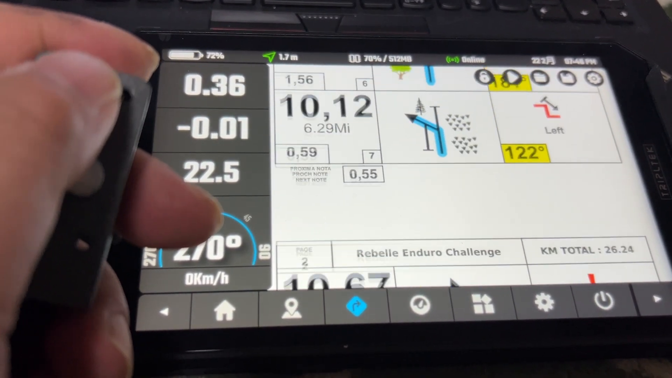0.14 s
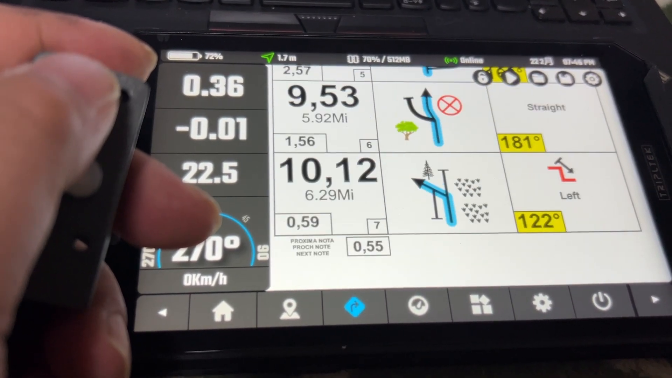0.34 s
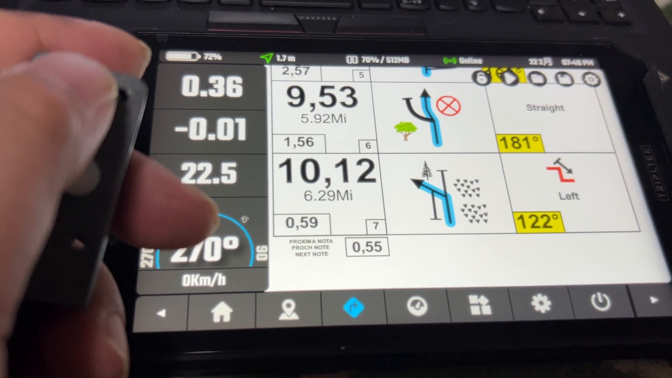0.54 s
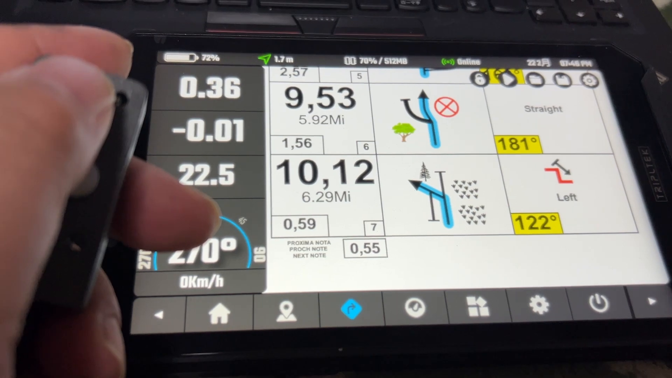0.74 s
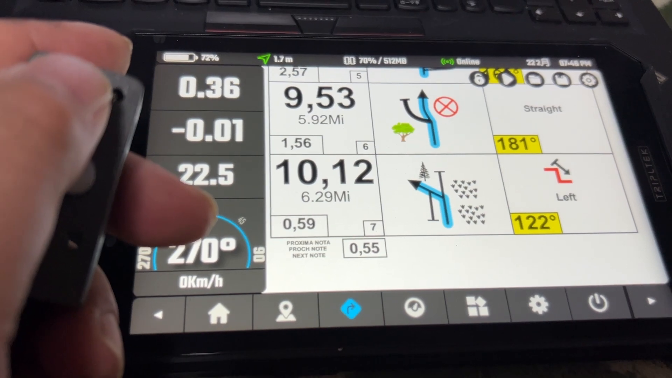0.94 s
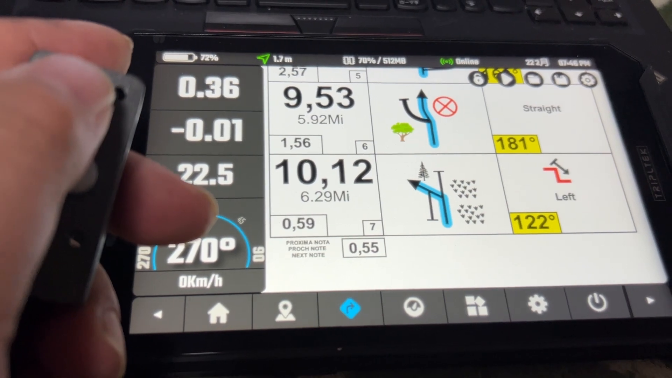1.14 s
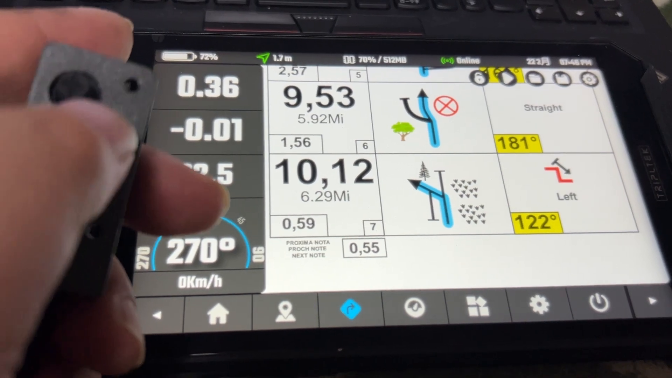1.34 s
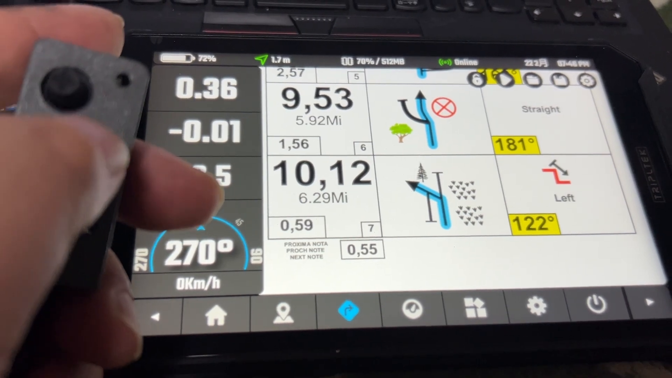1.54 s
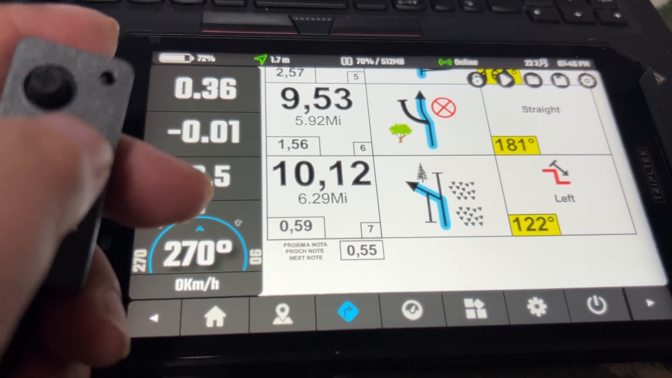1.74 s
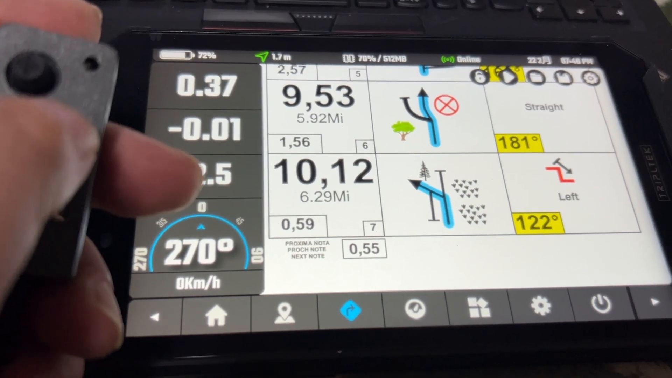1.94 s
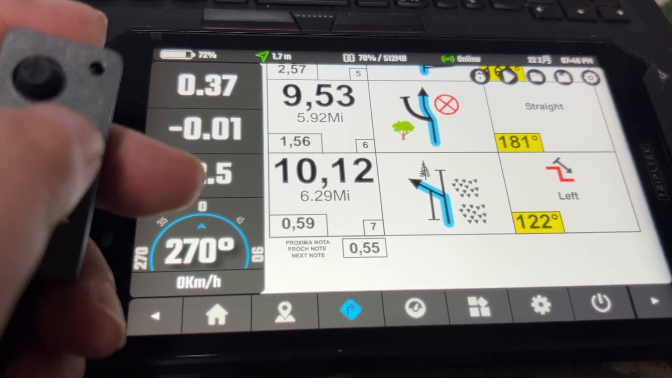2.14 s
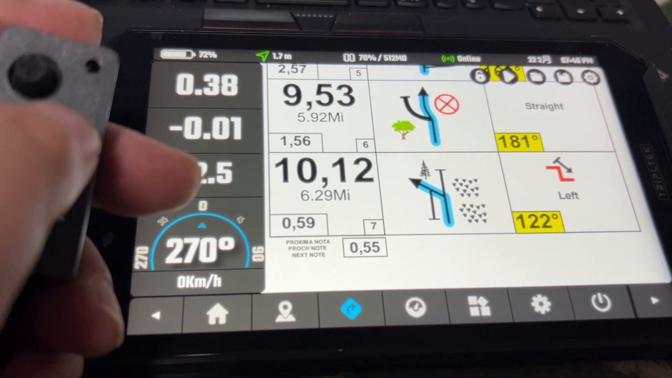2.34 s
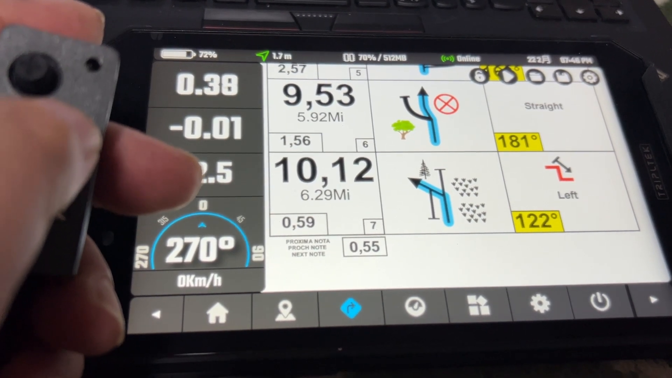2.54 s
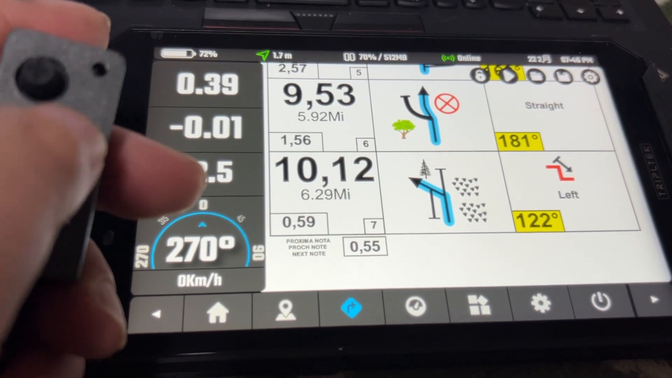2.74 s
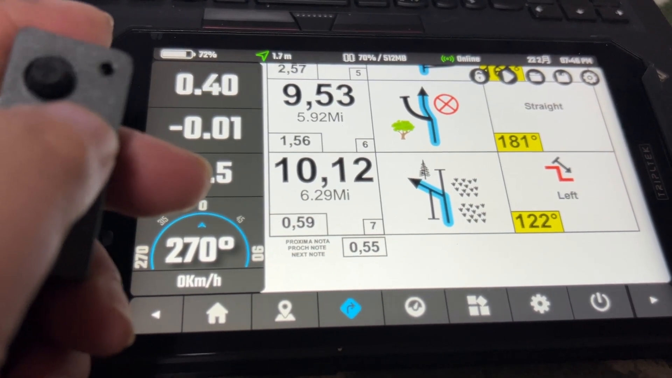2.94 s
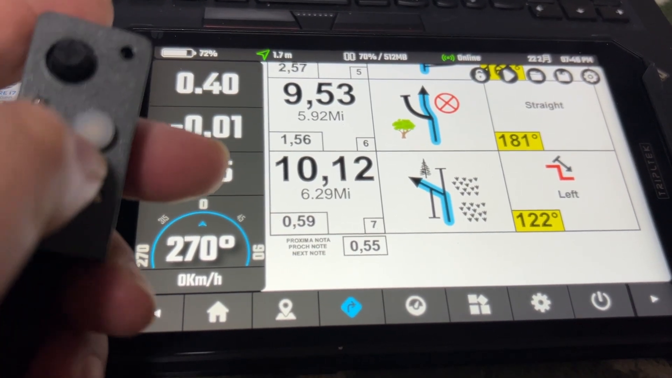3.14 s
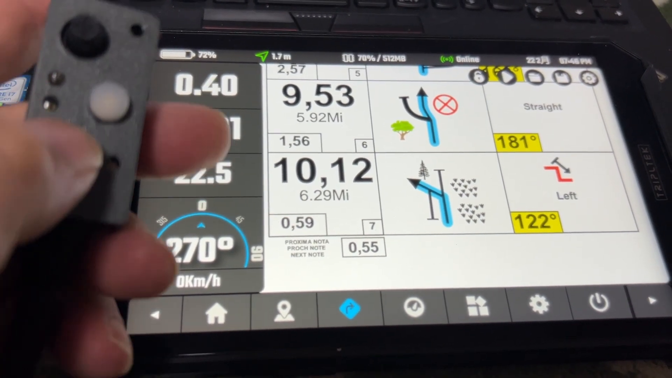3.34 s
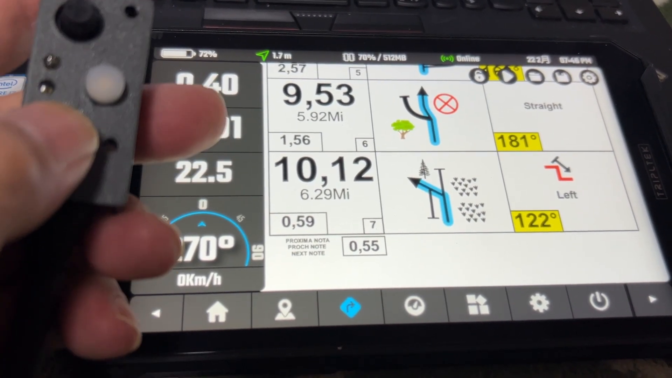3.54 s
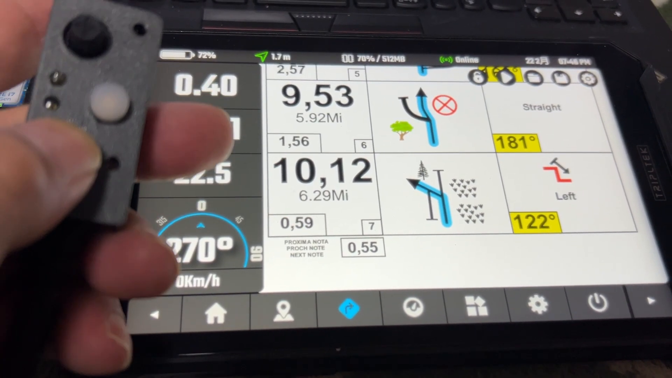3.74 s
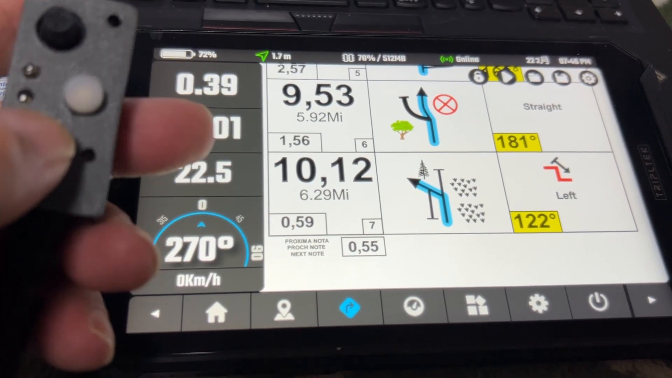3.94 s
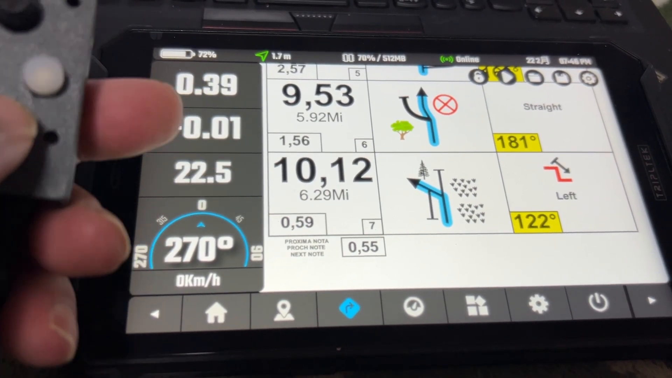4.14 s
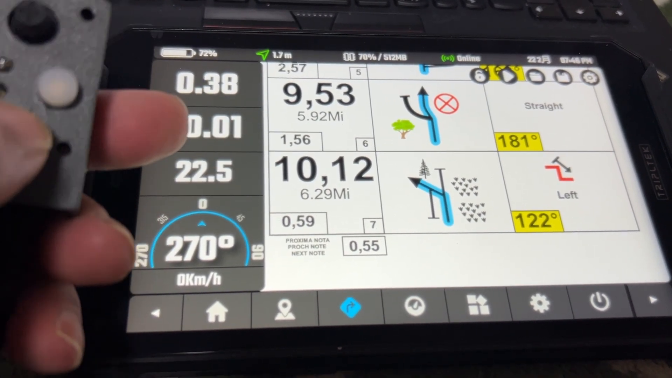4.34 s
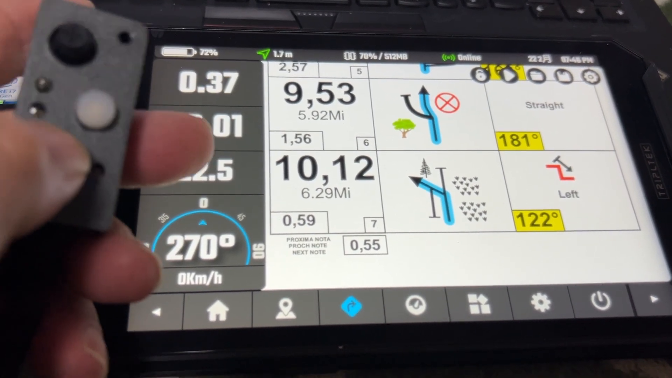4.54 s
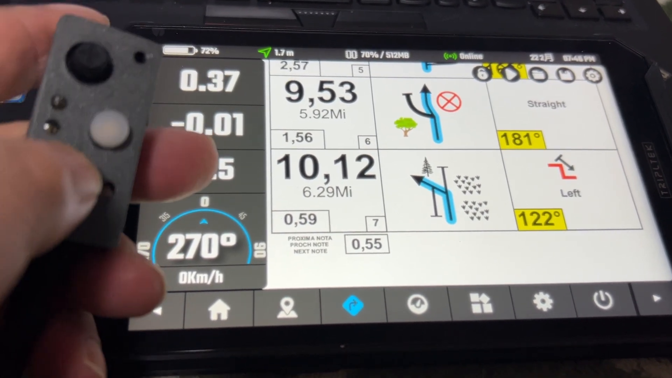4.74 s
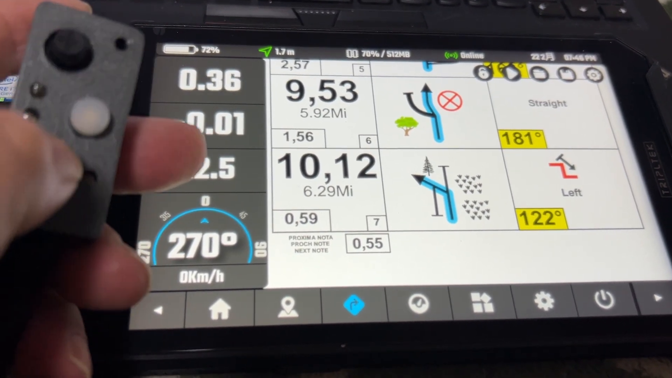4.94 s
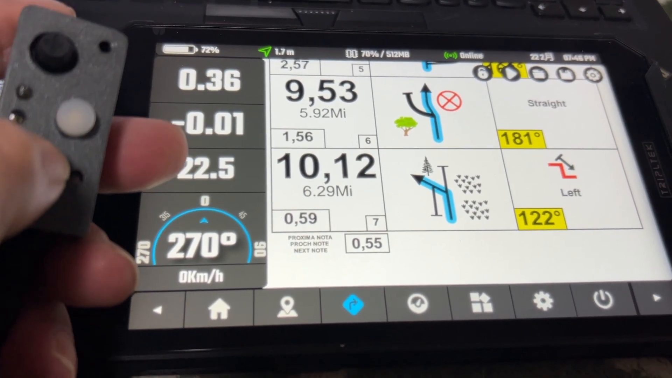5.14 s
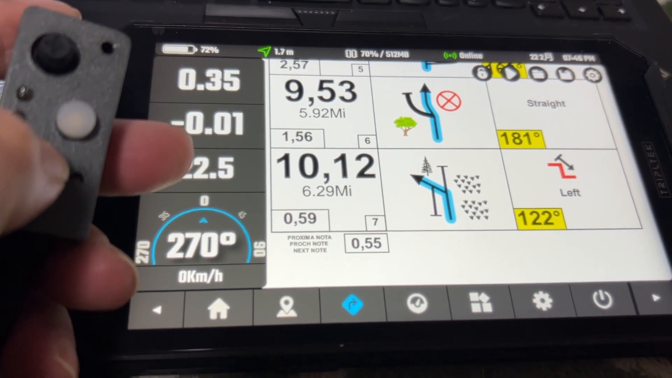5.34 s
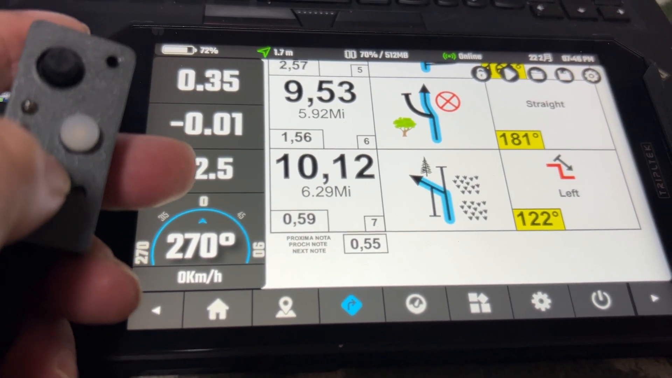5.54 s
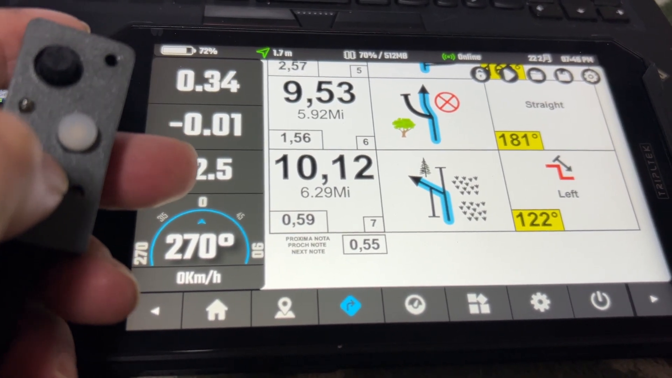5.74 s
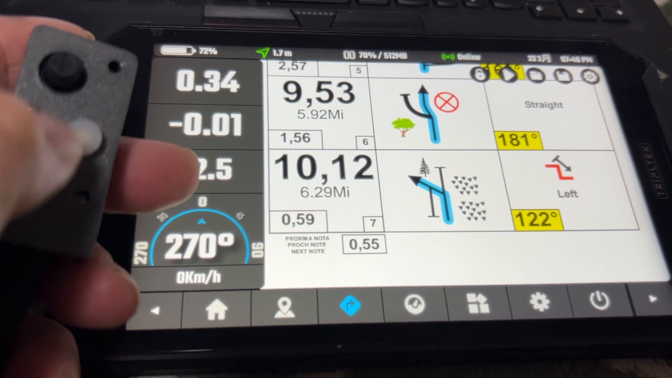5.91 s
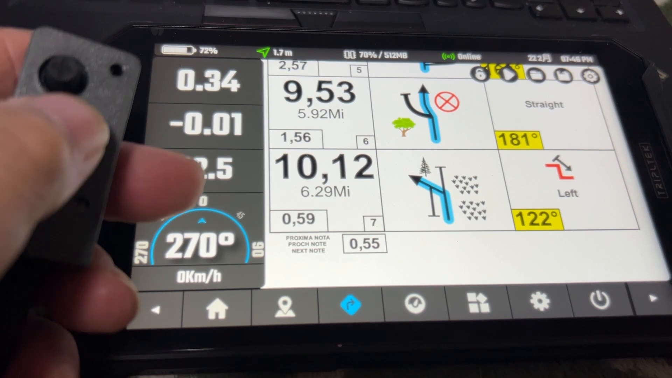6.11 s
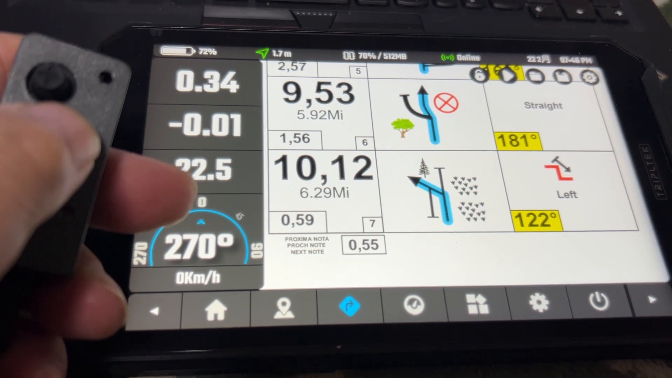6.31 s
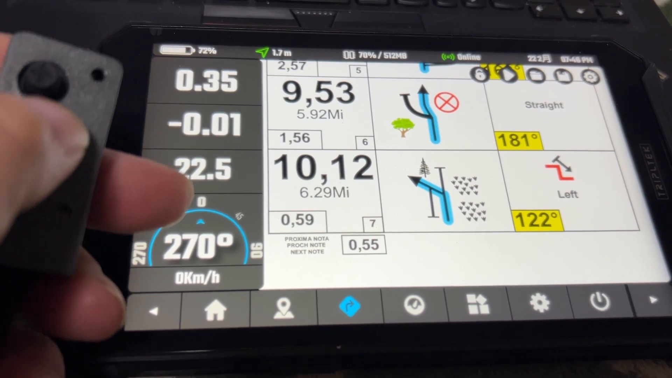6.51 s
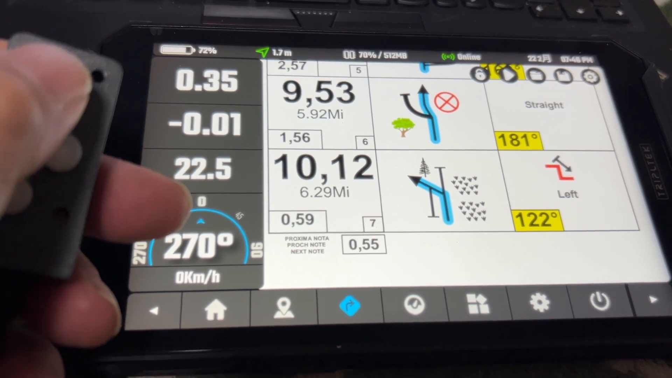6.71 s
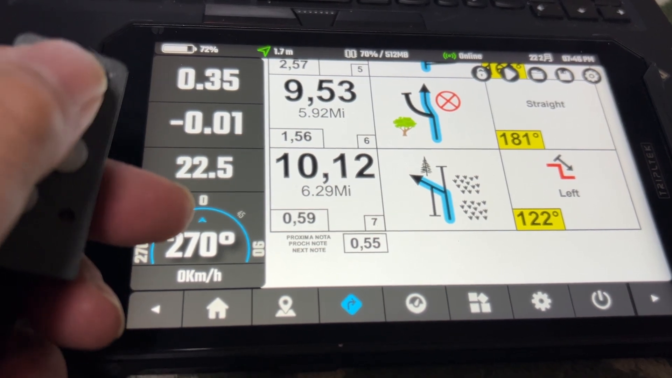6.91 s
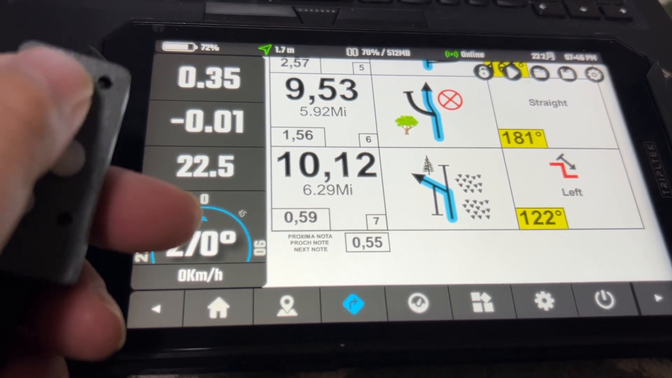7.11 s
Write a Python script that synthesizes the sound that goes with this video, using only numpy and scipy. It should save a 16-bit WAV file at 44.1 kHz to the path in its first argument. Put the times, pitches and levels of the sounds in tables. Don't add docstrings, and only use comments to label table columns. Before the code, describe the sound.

Tiny snapping buttons on a handheld remote, recorded very near on a phone held in the hand. After an opening of low rumble, four strong clicks with softer releases follow at a steady pace. Thumpy grip noise leads into six quieter clicks with faint releases, then a single flat-thumb click pair near the end. The small indoor space answers only slightly, with a weak fan hum underneath.

```python
import sys
import numpy as np
from scipy import signal
from scipy.fft import rfft, irfft, next_fast_len
from scipy.io import wavfile
from scipy.ndimage import uniform_filter1d

SR = 44100
rng = np.random.default_rng(int(sys.argv[2]) if len(sys.argv) > 2 else 0)


def log_audio(samples):
    frames = np.atleast_2d(samples).T
    limited = np.clip(frames, -1, 1)
    pcm = np.round(limited * 32767).astype(np.int16)
    wavfile.write(sys.argv[1], SR, pcm)


def undo_db(level):
    steps = np.asarray(level, float) / 20
    return 10 ** steps


N = 320695
PADDED = next_fast_len(N)
FFT_HZ = np.arange(PADDED // 2 + 1) * SR / PADDED
TREBLE_HZ, TOP_HZ = 7000, 11000
OPPOSED = np.array([[1], [-1]])

# start in seconds, peak in dB, treble in relative dB,
# top treble in relative dB, case pitch as a factor.
UPPER_DOWN = [
    (1.7271, -27, -21.5, -31.5, 0.87),
    (2.0701, -28, -19, -25, 0.9),
    (2.4014, -27.5, -18.5, -23.5, 0.91),
    (2.7696, -28.5, -21, -29, 0.883),
]
UPPER_UP = [
    (1.846, -31, -37.5, -39.5, 0.95),
    (2.1847, -30.5, -34, -44.5, 0.95),
    (2.5058, -30.5, -38.5, -54, 0.96),
    (2.8919, -31, -35, -45.5, 0.96),
]
LOWER_DOWN = [
    (3.6571, -37.5, -15, -12.5, 0.92),
    (4.0331, -39.5, -16.5, -13.5, 0.91),
    (4.366, -39, -16.5, -12.5, 0.94),
    (4.7427, -37, -20, -12.5, 0.94),
    (5.1174, -39.5, -20, -12.5, 0.91),
    (5.553, -38.5, -16.5, -12.5, 0.91),
]
LOWER_UP = [
    (4.1544, -42, -37, -35, 0.92),
    (4.4872, -40.5, -37, -30, 0.92),
    (4.877, -44, -41, -41, 0.94),
    (5.2668, -41, -49, -57, 0.95),
    (5.6954, -44.5, -35, -53, 0.91),
]
SLIP_UP = [
    (3.7886, -40, -26, -30.5, 0.91),
]
FLAT_DOWN = [
    (6.2594, -34, -19, -17.5, 0.96),
]
FLAT_UP = [
    (6.3986, -31.5, -33, -34, 0.97),
]
TICKS = [(3.133, -85, -6, 4, 1.0), (3.148, -84, -6, 4, 1.0), (3.322, -81, -2, 1, 1.0),
         (6.795, -76, -8, -11, 0.9), (6.955, -72, -20, -18, 0.86), (3.5155, -75, -11, -12, 1.0),
         (3.821, -58, -21, -13, 0.92), (5.8578, -57.5, -25, -6, 0.98), (6.446, -75, 6, -12, 0.86),
         (6.4634, -76, 4, -14, 1.0), (6.4715, -79, 5, -14, 1.0), (6.026, -80, -3, -5, 0.93),
         (3.874, -79, -20, -6, 1.0), (6.7125, -75, -20, -30, 1.0), (7.167, -67, -23, -22, 0.92)]
TAPS = [
    (1.378, -55, 0, -27, 0.91),
    (3.0964, -62.5, -15, -45, 0.97),
]
# start in seconds, peak in dB, pitch in Hz, swell in ms.
PIPS = [
    (3.0955, -74, 4700, .5),
    (3.3635, -76, 6200, .5),
    (1.3775, -62, 1650, .7),
    (3.401, -81, 5400, .5),
    (3.436, -80, 4100, .6),
    (5.8575, -68, 4200, .4),
    (6.7123, -63, 4800, 0.64),
]

# frequency in Hz, level in dB, swell time in ms, delay in ms.
UPPER_DOWN_MODES = [(1820, -11.5, 0.46, 0.068), (2800, -11, 0.27, 0.055), (4100, -5.5, 0.29, .65),
                    (5240, -2.5, 0.25, 0.38), (5760, -8, 0.28, 0.15), (7045, -6, 0.43, 0.076),
                    (8800, 13.5, 0.14, 0.018), (13100, -1.5, 0.087, .02), (14400, 14.5, 0.11, 0.018),
                    (16200, 6, .2, .02)]
UPPER_UP_MODES = [(1730, -6, 0.48, 0.027), (2820, -7.5, 0.17, 0.06), (3940, 0.5, 0.39, 0.31),
                  (5080, -10.5, 0.29, 0.14), (6500, -10.5, 0.17, 0.14), (9200, 10.5, 0.24, 0.088),
                  (12360, 5, .25, 0.045), (14600, 10, .2, 0.041)]
LOWER_DOWN_MODES = [(1740, -8, 0.57, .05), (2800, -11, 0.23, .05), (4050, -7.5, 0.19, .05),
                    (5430, -2.5, 0.15, .45), (6700, 2, 0.13, 0.45), (8930, 6.5, 0.12, .02),
                    (10130, 14, 0.17, .02), (12650, 1, 0.13, .02), (14700, 13, 0.1, .02),
                    (16200, 4, .2, .02)]
LOWER_UP_MODES = [(1730, 2, 0.56, .05), (2770, 3, 0.23, .05), (3700, 4.5, 0.26, 0.093),
                  (5060, -5, 0.27, 0.17), (6850, -13, 0.079, 0.1), (8900, 8, .2, .05),
                  (13000, 5.5, .15, .05), (14800, 7, 0.17, .05)]
SLIP_MODES = [(1880, -1, 0.46, .05), (2900, -2.5, 0.23, .05), (3870, -5, 0.25, .09), (4700, -4, 0.34, .25),
              (5400, -2.5, 0.26, 0.092), (6400, -17, .2, .09), (8000, 10.5, 0.23, .05), (9300, 3, .18, .05),
              (11100, 3, .2, .05), (13700, 7, .15, .05), (15700, 4, .17, .05)]
FLAT_DOWN_MODES = [(1800, -10, 0.33, .05), (2600, -21, .22, .05), (4350, -1, 0.33, .4),
                   (5100, -11, .25, .2), (6100, -11, .25, 0.14), (8700, 13, .16, .02),
                   (12300, 8, 0.11, .02), (14200, 8.5, .12, .02), (16100, 3, .2, .02)]
FLAT_UP_MODES = [(1740, -6, 0.54, .03), (2800, -10, .18, .06), (3850, -0.5, 0.37, 0.34),
                 (4420, -6, 0.37, .33), (6000, -13, 0.16, .11), (9050, 11, .2, .09),
                 (13600, 9.5, .18, .045), (15600, 11, .2, .04)]
TICK_MODES = [(2200, -12, 0.21, 0.057), (5200, -6, 0.47, 0.11), (6940, -1, 0.25, 0.064),
              (8500, 4, 0.24, .05), (11300, 7, 0.18, 0.055), (14400, -0.5, .2, .05)]
TAP_MODES = [(1990, 0, 0.25, .05), (3000, -4, 0.29, .05), (6980, -13, .25, .05), (11500, -1, .2, .05),
             (14000, 6, .25, .05)]

# centre in Hz, width in Hz, depth from 0 to 1.
UPPER_GAPS = [(3300, 280, 0.5), (4140, 300, 0.65), (6000, 730, 0.6), (7050, 500, .9)]
UPPER_UP_GAPS = [(3320, 250, 0.47), (4180, 330, 0.92), (7000, 400, .9), (7900, 300, .6)]
LOWER_GAPS = [(3330, 150, 0.48), (4650, 430, 0.88), (7900, 610, 0.56), (11200, 860, 0.45)]
FLAT_GAPS = [(3250, 220, 0.62), (7200, 400, .8), (10900, 500, .6)]

# frequency in Hz, level in dB.
UPPER_DOWN_FAR = [(1500, 6.5), (2700, 8), (4300, 15), (5400, 12), (6500, 2), (9000, 3.5), (12500, 3),
                  (15000, 4.5)]
UPPER_UP_FAR = [(1500, 15.5), (2700, 11.5), (4000, 17.5), (5200, 8.5), (6500, 2), (9000, -7), (12500, -7.5),
                (15000, -8.5)]
LOWER_DOWN_FAR = [(1500, 12), (2700, 17), (4700, 17), (5800, 18.5), (7200, 14), (9000, 11), (12500, 16),
                  (15000, 17)]
LOWER_UP_FAR = [(1500, 17.5), (2700, 19), (4000, 15.5), (5200, 10.5), (6500, 2), (9000, -3.5),
                (12500, -0.5), (15000, 0)]
FLAT_DOWN_FAR = [(1500, 10), (2700, 11), (4200, 15), (5400, 15), (6500, 8), (9000, 8), (12500, 12),
                 (15000, 13)]
FLAT_UP_FAR = [(1500, 14), (2700, 14), (4000, 15), (5200, 8), (6500, 3), (9000, 0), (12500, 4), (15000, 2)]
TICK_FAR = [(1500, 1), (4500, 11), (7000, 11), (9000, 9), (12500, 8), (15000, 5)]

# delay in ms, level in dB.
WALL_ECHOES = [(9.8, -38.5), (13.4, -22.5), (18.3, -28.5), (21.0, -33)]
# low edge in Hz, high edge in Hz, level in dB, T60 in seconds, share apart as a ratio.
TAILS = [(1210, 3600, -40, 0.24, 0.37), (4330, 6500, -45, 0.3, 0.34), (6500, 9000, -47.5, 0.3, .4),
         (9000, 9600, -50, .5, .1), (11000, 17000, -59, .6, 0.33)]

# time in seconds, level in dB.
GRIP_TENSION = [(0.0, -40), (0.34, -59), (0.63, -52.5), (0.79, -45.5), (1.78, -48.5), (2.33, -46),
                (2.87, -38.5), (3.7, -40), (4.47, -47), (4.76, -56.5), (4.9, -45.5), (5.12, -42),
                (5.7, -43.5), (5.92, -64), (6.34, -60), (6.48, -46), (6.76, -50), (7.27, -44.5)]
# start in seconds, peak in dB, hold in seconds, brightness in dB.
SQUEEZES = [(0.0, -40, 0.067, -23), (0.188, -41, 0.028, -17), (0.323, -47.5, 0.01, 1.5),
            (0.612, -56, .02, 9), (0.734, -52, 0.019, 12.5), (0.872, -55, 0.044, 21),
            (1.35, -42, 0.088, 3.5), (1.47, -51.5, .02, 6), (1.671, -46, 0.056, 4.5),
            (2.008, -44, 0.044, 2), (2.12, -40.5, 0.042, 3), (2.357, -40.5, 0.041, -1),
            (2.553, -35.5, 0.012, -23), (2.691, -32, 0.089, -16.5), (2.955, -25, 0.039, -27.5),
            (3.051, -26, 0.033, -33.5), (3.202, -31.5, 0.019, -15), (3.275, -32.5, 0.046, -28),
            (3.506, -40, 0.041, 1), (3.743, -34.5, 0.039, -5), (4.048, -45, 0.023, -1.5),
            (4.134, -38, .02, -21), (4.202, -34, 0.015, -7), (4.485, -40, 0.017, -24),
            (4.56, -46.5, 0.018, -7), (4.632, -44, 0.044, -28), (4.948, -45.5, 0.03, 3.5),
            (5.087, -60, 0.03, -10), (5.483, -45, 0.053, 8.5), (5.764, -43, 0.034, 11.5),
            (5.871, -41.5, 0.018, -24), (5.965, -47, 0.034, -16), (6.037, -46.5, 0.027, -15),
            (6.106, -46, 0.024, -10), (6.222, -66, 0.052, 21), (6.361, -47.5, 0.038, 11),
            (6.579, -45.5, 0.014, 1), (6.645, -44.5, 0.013, -19), (6.94, -42, 0.024, -3),
            (7.23, -46, .05, -14)]
RUMBLE_APART_DB = [-16.5, -12, -10.5]
# start in seconds, peak in dB, final pitch in Hz, starting pitch as a factor.
BUMPS = [(0.2, -31.5, 80.4, 1.7), (0.325, -37.5, 95, 1.3), (0.879, -29, 88, 2.06), (2.04, -38.5, 200, 0.89),
         (2.78, -25, 119, 1.35), (3.205, -25, 110, 1.45), (4.183, -30, 160, 1.4), (4.48, -34.5, 110, 1.3),
         (1.46, -33, 176, 1.4), (2.128, -22.5, 168, 0.72), (2.38, -27.5, 81, 2.94), (2.433, -24, 82, 1.61),
         (2.544, -21.5, 82, 1.5), (2.689, -12.5, 83, 0.79), (2.983, -25, 111, 1.33), (3.05, -27, 61, 1.97),
         (3.086, -18.5, 94, 1.19), (3.269, -26, 71, 1.87), (3.486, -14.5, 80.7, 0.9),
         (3.518, -13.5, 88.3, 0.85), (3.554, -17, 94.5, 2.3), (3.595, -19.5, 67.6, 1.6),
         (3.643, -19.5, 82.5, 1.6), (3.729, -15, 140, 1.28), (4.021, -28, 71.6, 1.8), (4.054, -23, 86, 1.6),
         (4.193, -21.5, 78, 1.47), (5.757, -21.5, 140, 1.1), (4.562, -27, 78.2, 1.45),
         (5.796, -25, 109, 1.4), (5.463, -30, 197, 0.76), (5.739, -25, 129.5, 2.92), (5.716, -26, 110, 1.1),
         (6.36, -27, 77.6, 1.23), (6.469, -24, 134, 1.05), (6.574, -26.5, 81, 1.54),
         (6.944, -30.5, 102.3, 2)]
# start in seconds, peak in dB, pitch in Hz, swell in cycles.
FINGERTIPS = [(0.015, -44.5, 328, 0.66), (0.041, -51, 298, 0.67), (0.88, -46.5, 250, 1.5),
              (5.738, -31, 265, 0.8), (5.793, -47, 290, .9), (3.556, -45, 250, 1.2), (3.548, -48, 370, .8),
              (2.38, -45, 310, .8), (2.982, -46, 280, 0.87), (4.482, -49, 330, 0.48),
              (0.203, -47, 302, 0.48), (3.51, -39.5, 239, 1.1), (3.604, -38.5, 226, 1.1),
              (4.01, -39, 257, 0.79), (4.05, -39.5, 285, 1.05), (4.181, -25, 261, 0.44),
              (4.1895, -29, 252, 0.3), (5.762, -32.5, 275, 0.94), (6.364, -47.5, 260, 1.1),
              (6.476, -49, 258, .8), (6.577, -38.5, 287, 0.77)]

# start in seconds, peak in dB, hold in seconds.
RUBS = [(0.0, -91, .01), (.62, -86.5, .03), (3.12, -86, 0.23), (3.315, -77.5, 0.074), (3.4, -83.5, 0.095),
        (3.88, -100, .03), (5.87, -83.5, 0.0035), (5.98, -91, .01), (6.44, -91, 0.032), (6.72, -90, .01),
        (7.2, -100, .07)]
# frequency in Hz, density in dB per Hz.
RUB_COLOUR = [(2500, -9), (5000, 6.5), (7500, -2.5), (10000, -5.5), (13000, -3.5), (16000, -6.5)]
ROOM_TONE = [(80, -31), (120, -9), (222, -4), (284, -9.5), (535, -20.5), (700, -18.5), (1030, -17.5),
             (1250, -18), (1550, -26), (2240, -35.5), (3000, -36.5), (4500, -50.5), (7350, -55),
             (10000, -56.5), (16000, -60.5)]
# frequency in Hz, correlation as a ratio.
LIKENESS = [(150, 0.8), (350, 0.59), (550, 0.11), (950, 0.68), (1400, 0.6), (2400, 0.15), (6000, 0.15),
            (8500, 0.79)]
# frequency in Hz, left minus right in dB.
LEAN = [(380, -1), (700, 5), (1290, -2.5), (2380, 3), (4400, -1.5), (8000, 1)]
# frequency in Hz, phase in radians.
PHASE_LEAD = [(200, 0), (400, .55), (580, 2.1), (850, 1.3), (1300, 2.3), (1900, .8), (2500, .35), (5000, 0)]
# pitch in Hz, RMS level in dB.
FAN = [(659.2, -81), (696.8, -73)]


def rms_one(x):
    return x / np.sqrt(np.mean(x ** 2) + 1e-20)


def at_hz(points, hz):
    table_hz, values = np.transpose(points)
    return np.interp(np.log(hz), np.log(table_hz), values)


def band(x, low_hz, high_hz, order=2):
    return signal.sosfilt(signal.butter(order, [low_hz, high_hz], "band", fs=SR, output="sos"), x)


def notch(x, hz, width_hz):
    return signal.lfilter(*signal.iirnotch(hz, hz / width_hz, fs=SR), x)


def resonance(x, hz, width_hz):
    return signal.lfilter(*signal.iirpeak(hz, hz / width_hz, fs=SR), x)


def later(x, ms):
    return np.interp(np.arange(N) - ms * SR / 1000, np.arange(N), x, left=0)


def above(cut_hz, width_hz):
    return .5 + .5 * np.tanh((FFT_HZ - cut_hz) / width_hz)


def delay(ms):
    return np.exp(-2j * np.pi * FFT_HZ * ms / 1000)


def shaped(x, response):
    return irfft(rfft(x, PADDED) * response, PADDED)[..., :N]


def drift(rate_hz):
    pole = np.exp(-2 * np.pi * rate_hz * 40 / SR)
    noise = rng.standard_normal(N // 40 + 2002)
    slow = signal.lfilter([1], [1, -2 * pole, pole ** 2], noise)[2000:]
    return np.interp(np.arange(N) / 40, np.arange(len(slow)), rms_one(slow))


def gestures(rows, rise_db_per_s, fall_db_per_s):
    t = np.arange(0, N + 40, 40) / SR
    power = 1e-14
    for start_s, db, hold_s in rows:
        rising_db = rise_db_per_s * np.maximum(start_s - t, 0)
        falling_db = fall_db_per_s * np.maximum(t - start_s - hold_s, 0)
        power = power + undo_db(db - rising_db - falling_db) ** 2
    return np.interp(np.arange(N) / SR, t, np.sqrt(power))


def add(track, start_s, piece):
    i = int(start_s * SR)
    track[i:i + len(piece)] += piece[:N - i]


def swell(hz, swell_s, length_s, start=0.97):
    t = np.arange(int(length_s * SR)) / SR
    settle_s = 2 * swell_s
    turns = hz * (t + (start - 1) * settle_s * (1 - np.exp(-t / settle_s)))
    return t / swell_s * np.exp(1 - t / swell_s) * np.sin(2 * np.pi * turns)


def snaps(events, modes, trim_db):
    out = np.zeros(N)
    chance_db = rng.normal(0, .6, (len(events), len(modes)))
    for (start_s, db, treble_db, top_db, pitch), vary_db in zip(events, chance_db):
        for k, (hz, mode_db, swell_ms, late_ms) in enumerate(modes):
            is_treble = hz > TREBLE_HZ
            colour_db = top_db if hz > TOP_HZ else treble_db if is_treble else 0
            height = (-1) ** k * undo_db(db + trim_db + mode_db + colour_db + vary_db[k])
            tuned_hz = hz if is_treble else hz * pitch
            lead_ms = .45 if is_treble else .25
            add(out, start_s + (late_ms - lead_ms) / 1000, height * swell(tuned_hz, swell_ms / 1000, 0.0072))
    return out


def gaps(x, rows):
    for hz, width_hz, depth in rows:
        x = x + depth * (notch(x, hz, width_hz) - x)
    return x


def remote():
    upper_down = snaps(UPPER_DOWN, UPPER_DOWN_MODES, trim_db=0.5)
    upper_up = snaps(UPPER_UP, UPPER_UP_MODES, trim_db=-1.0)
    lower = snaps(LOWER_DOWN, LOWER_DOWN_MODES, trim_db=3.0)
    lower += snaps(LOWER_UP, LOWER_UP_MODES, trim_db=-0.5)
    flat = snaps(FLAT_DOWN, FLAT_DOWN_MODES, trim_db=1.5)
    flat += snaps(FLAT_UP, FLAT_UP_MODES, trim_db=-1.0)
    ticks = snaps(TICKS, TICK_MODES, trim_db=2.5)
    ticks += snaps(TAPS, TAP_MODES, trim_db=5.0)
    ticks += snaps(SLIP_UP, SLIP_MODES, trim_db=1.5)
    for start_s, db, hz, swell_ms in PIPS:
        add(ticks, start_s, undo_db(db) * swell(hz, swell_ms / 1000, .008))
    upper = gaps(upper_down, UPPER_GAPS) + gaps(upper_up, UPPER_UP_GAPS)
    return upper + gaps(lower, LOWER_GAPS) + gaps(flat, FLAT_GAPS) + ticks


def phone_body(x):
    high = above(4300, 600)
    edge_echo = 1 - 0.49 * (1 - high) * delay(1.176)
    shaded = undo_db(-5.5 + 1.9 * high) * delay(0.019) * edge_echo
    treble = above(TREBLE_HZ, 100)
    ports = np.array([np.ones_like(treble), treble + (1 - treble) * shaded])
    return shaped(x, above(1692, 53) * (1 - above(16600, 100)) * ports)


def far_field():
    out = np.zeros(N)
    hz = np.maximum(np.arange(129) * SR / 256, 1)
    kinds = [(UPPER_DOWN, UPPER_DOWN_FAR), (UPPER_UP, UPPER_UP_FAR),
             (FLAT_DOWN, FLAT_DOWN_FAR), (FLAT_UP, FLAT_UP_FAR), (LOWER_DOWN, LOWER_DOWN_FAR),
             (LOWER_UP + SLIP_UP + TAPS, LOWER_UP_FAR), (TICKS, TICK_FAR)]
    for events, colour in kinds:
        pulse = np.roll(irfft(undo_db(at_hz(colour, hz))), 128) * np.hanning(256)
        for start_s, db, *_ in events:
            add(out, start_s - 100 / SR, undo_db(db) * pulse)
    return out


def room(beam, scattered):
    echoes = sum(undo_db(db) * later(beam, ms) for ms, db in WALL_ECHOES)
    hollow = resonance(echoes, 4200, 350)
    hum = resonance(later(beam, 1.3) + undo_db(6.0) * echoes, 4200, 90)
    t = np.arange(int(.4 * SR)) / SR
    early_gain, first_wall_s = undo_db(-1), .0125
    build_up = early_gain + (1 - early_gain) * np.clip((t - first_wall_s) / 0.0035, 0, 1)
    common, own = build_up * rng.standard_normal((2, len(t)))
    tail = np.zeros((2, len(t)))
    for low_hz, high_hz, db, t60_s, apart in TAILS:
        noise = band(common + apart * own * OPPOSED, low_hz, high_hz, order=3)
        tail += noise * undo_db(db - 60 * t / t60_s)
    reverb = signal.fftconvolve(scattered[None], tail, axes=1)[:, :N]
    direct_echo = undo_db(-5.5) * band(echoes, 2900, 6500, order=3)
    return reverb + direct_echo + undo_db(-2.5) * hollow + undo_db(-13) * hum


def rumble():
    tension_db = np.interp(np.arange(N) / SR, *np.transpose(GRIP_TENSION))
    # low edge in Hz, high edge in Hz, share of brightness, tension in dB, squeeze in dB.
    layers = [(45.9, 83.9, 0.085, -3.5, -0.3), (84.5, 169.2, 0.59, -8.5, -4), (176, 243.1, 0.99, -10.5, -9.5)]
    out = np.zeros((2, N))
    for (low_hz, high_hz, share, steady_db, lump_db), apart_db in zip(layers, RUMBLE_APART_DB):
        moves = [(s, db + lump_db + share * bright_db, hold_s) for s, db, hold_s, bright_db in SQUEEZES]
        lumps = gestures(moves, rise_db_per_s=270, fall_db_per_s=550)
        noise = band(rng.standard_normal((2, N)), low_hz, high_hz, order=3)
        both, apart = rms_one(noise[0]), rms_one(noise[1])
        height = np.hypot(undo_db(tension_db + steady_db), lumps) * undo_db(2.2 * drift(31.0))
        out += height * (both + undo_db(apart_db) * apart * OPPOSED)
    return out


def knocks():
    out = np.zeros(N)
    for start_s, db, hz, start in BUMPS:
        add(out, start_s, undo_db(db - 6.5) * swell(hz, 0.57 / hz, 7 / hz, np.clip(start, 1, 4)))
    out = band(out, 27, 330, order=3)
    for start_s, db, hz, cycles in FINGERTIPS:
        add(out, start_s, undo_db(db) * swell(hz, cycles / hz, 12 / hz, 1.076))
    return band(out, 38, 830, order=3) * undo_db(.3 * OPPOSED)


def coloured(spectrum, patchy_db, patch_rate_hz):
    out = 0
    edges_hz = 100 * 2 ** np.arange(0, 7.5, 1 / 3)
    white = rng.standard_normal((2, 2, N))
    for k, (low_hz, high_hz) in enumerate(zip(edges_hz, edges_hz[1:])):
        hz = np.sqrt(low_hz * high_hz)
        if hz < spectrum[0][0] / 2:
            continue
        mid, side = band(white[k % 2], low_hz, high_hz)
        alike = .985 if hz > TREBLE_HZ * 1.2 else at_hz(LIKENESS, hz)
        level_db = at_hz(spectrum, hz) + patchy_db * drift(patch_rate_hz)
        gain = undo_db(level_db + at_hz(LEAN, hz) * .5 * OPPOSED)
        out = out + gain * (np.sqrt(1 + alike) * mid + np.sqrt(1 - alike) * side * OPPOSED)
    return rms_one(out)


def skin_rub():
    height = undo_db(-100) + gestures(RUBS, rise_db_per_s=450, fall_db_per_s=370)
    noise = coloured(RUB_COLOUR, patchy_db=1.5, patch_rate_hz=30.0)
    return height * noise * undo_db(1.5 * drift(60.0))


def room_tone():
    air = undo_db(-56) * coloured(ROOM_TONE, patchy_db=1.81, patch_rate_hz=4.8)
    phase = at_hz(PHASE_LEAD, np.maximum(FFT_HZ, 1)) * np.array([[1], [0]])
    tone = shaped(air, undo_db(-9 * above(14000, 80)) * np.exp(1j * phase))
    rim = band(air, 13900, 14600, order=4) * np.clip(drift(9.0) + .3, 0, 1)
    return tone + .8 * rim


def fan():
    t = np.arange(N) / SR
    whine = np.zeros(N)
    for hz, rms_db in FAN:
        height = np.sqrt(2) * undo_db(rms_db + 1.6 * drift(0.34))
        whine += height * np.sin(2 * np.pi * hz * t + 0.89 * drift(4.1))
    return whine * undo_db([[3], [-5]])


def scene():
    clicks = phone_body(remote())
    sideways = 0.69 * clicks[0] + 0.38 * notch(clicks[0], 5200, 730)
    faint = shaped(room(sideways, far_field()) + skin_rub(), undo_db(-25 * above(15300, 50)))
    return clicks + faint + rumble() + knocks() + room_tone() + fan()


def low_pass(x):
    return signal.sosfilt(signal.butter(12, 16560, fs=SR, output="sos"), x)


def record(dry):
    lead_ms, opposed_hz = .172, 9950
    treble = above(TREBLE_HZ, 100)
    lag = -delay(lead_ms) * np.exp(2j * np.pi * opposed_hz * lead_ms / 1000)
    left = shaped(dry[0], 1 - treble + treble * lag)
    shaking = uniform_filter1d(np.abs(dry[0]), size=600)
    whisper = undo_db(-64.0) * shaking * rms_one(band(rng.standard_normal(N), 9450, 9800))
    return low_pass(np.array([left, dry[1]]) + whisper)


dry = scene()
out = record(dry)
log_audio(out)
```